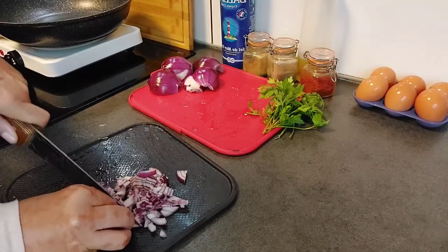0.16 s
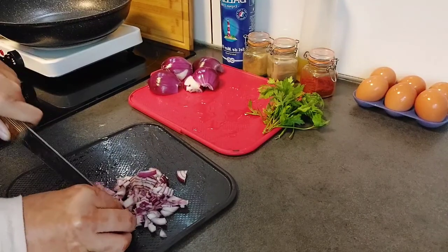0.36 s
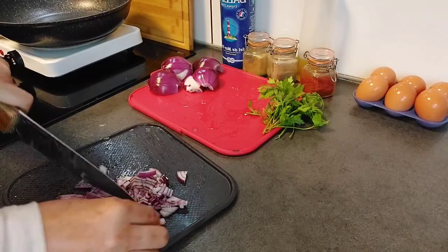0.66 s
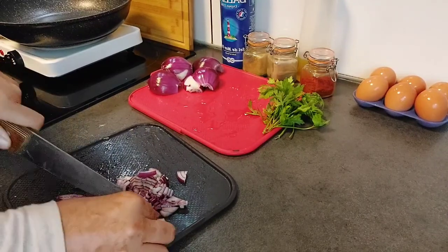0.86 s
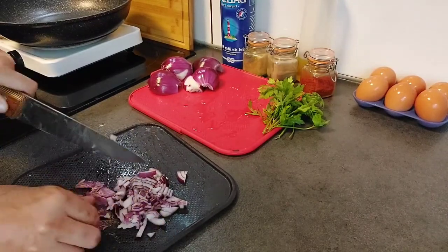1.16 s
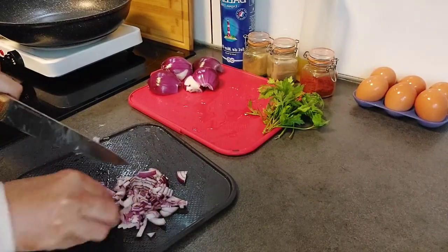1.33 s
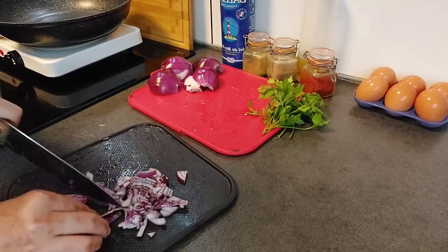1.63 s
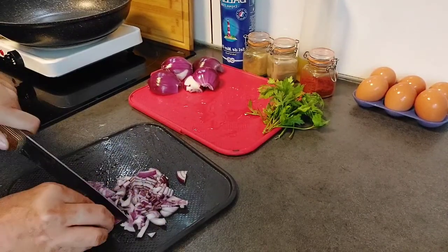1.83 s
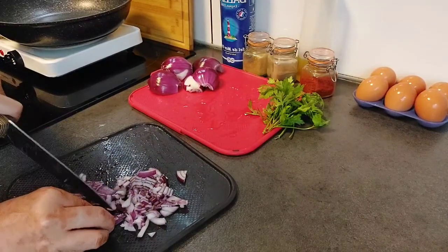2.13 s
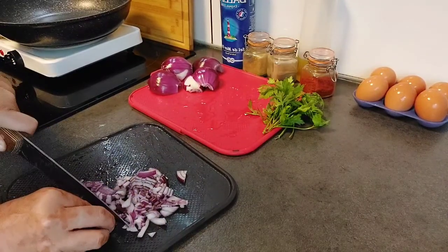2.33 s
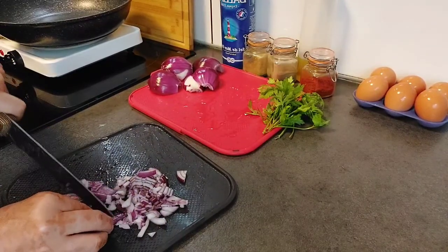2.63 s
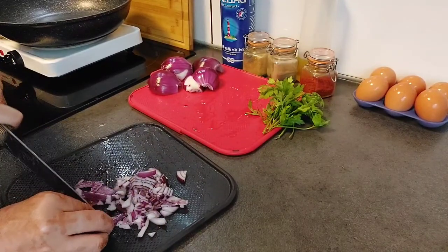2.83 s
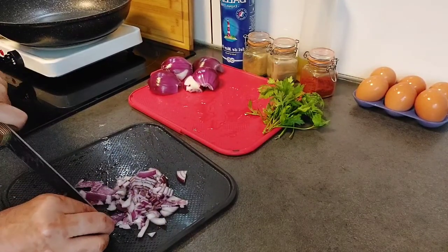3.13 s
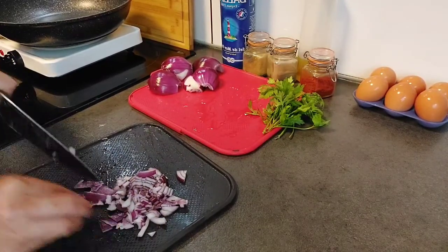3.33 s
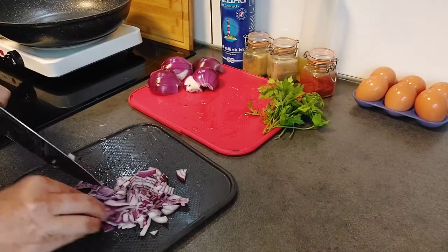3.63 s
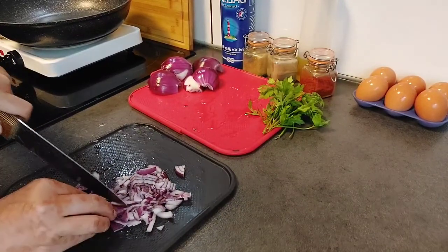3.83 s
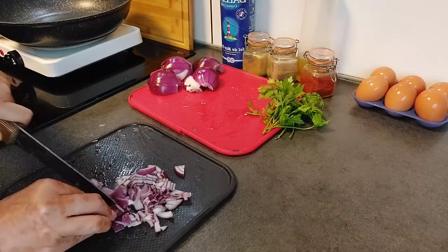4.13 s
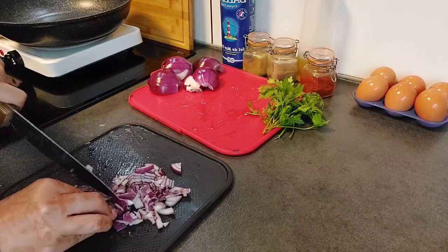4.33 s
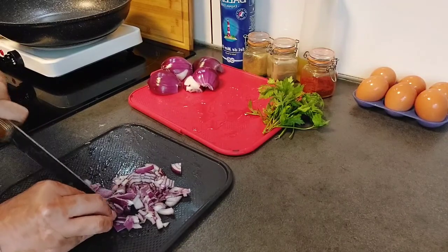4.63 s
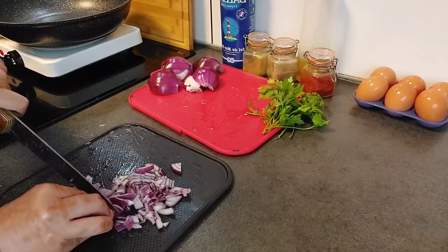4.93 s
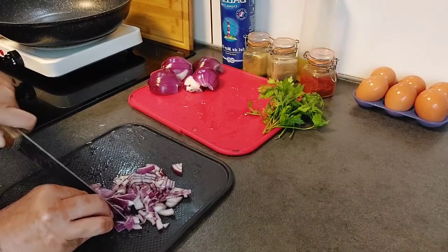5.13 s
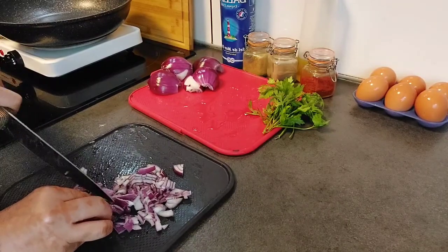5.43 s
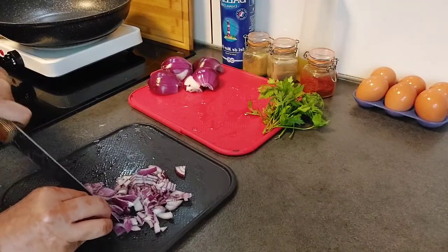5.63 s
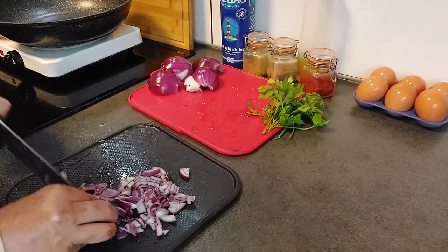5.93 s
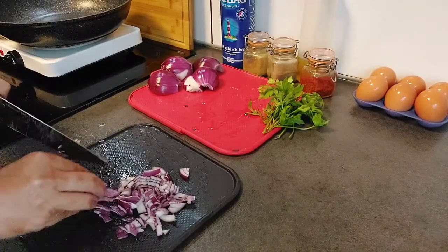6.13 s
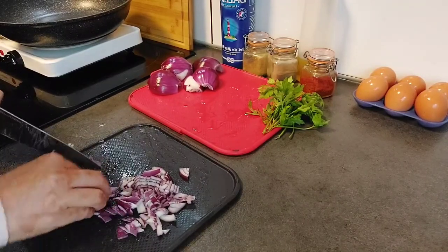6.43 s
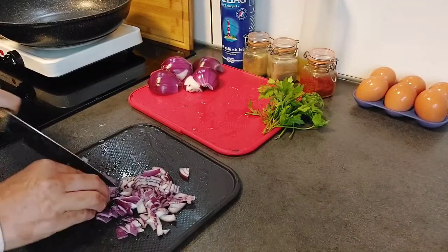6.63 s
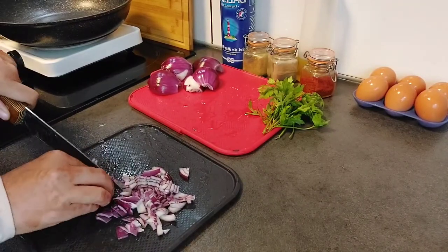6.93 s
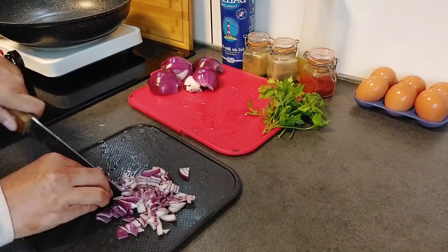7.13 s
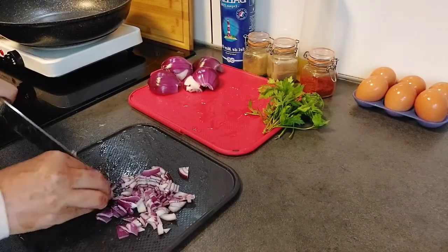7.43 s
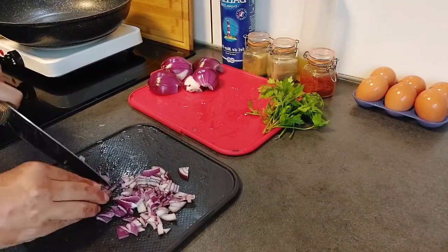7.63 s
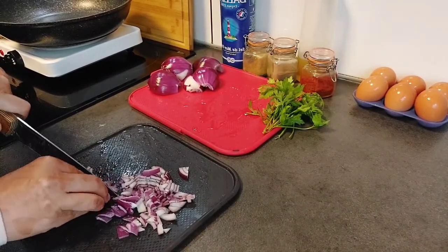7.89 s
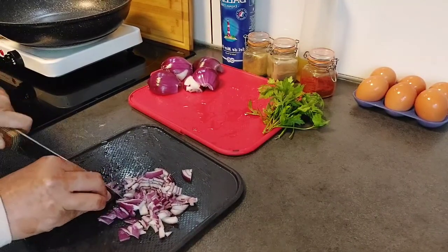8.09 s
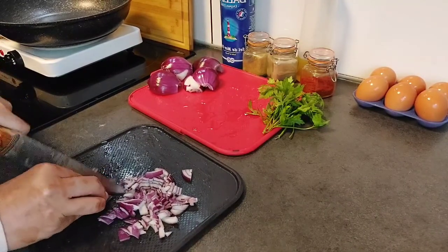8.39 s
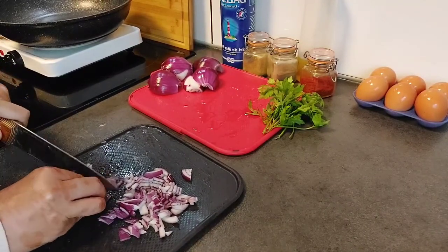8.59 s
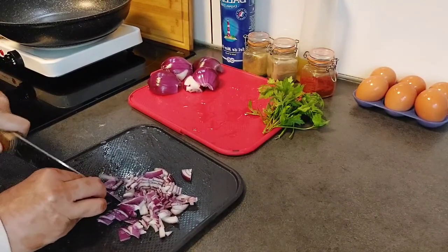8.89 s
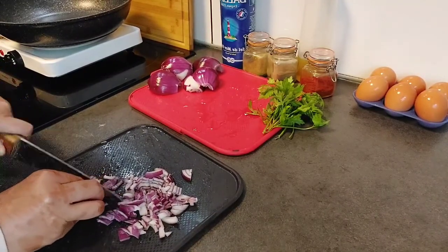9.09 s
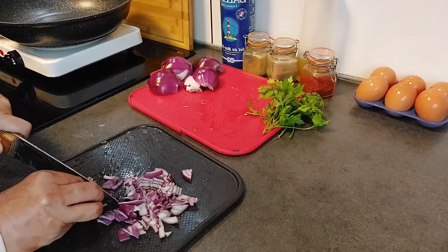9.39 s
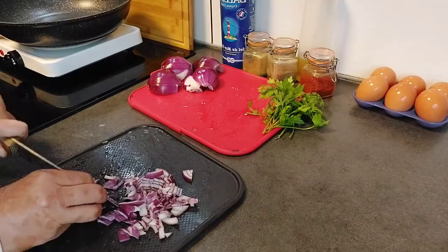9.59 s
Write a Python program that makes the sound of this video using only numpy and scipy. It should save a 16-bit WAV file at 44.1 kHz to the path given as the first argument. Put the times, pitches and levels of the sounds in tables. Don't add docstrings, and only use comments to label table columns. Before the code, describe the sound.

A knife dices onion on a plastic board on a counter, close to a stereo microphone. Wet layers crunch and snap, then the blade cracks onto the board with a short hollow bark. After light first cuts, the hardest knock comes near three seconds, a busier run follows in the middle, then a pause with rustling and two late cuts. The kitchen is small and reflective, with quiet air and a faint wall clock.

```python
import sys
import numpy as np
from scipy import signal
from scipy.fft import rfft, irfft, next_fast_len
from scipy.io import wavfile
from scipy.ndimage import uniform_filter1d

SR = 44100
rng = np.random.default_rng(int(sys.argv[2]) if len(sys.argv) > 2 else 0)


def persist_wave(psi):
    counts = np.round(np.clip(psi, -1, 1) * 32767).astype(np.int16)
    wavfile.write(sys.argv[1], SR, np.atleast_2d(counts).T)


def invert_db(level):
    return 10 ** (np.asarray(level, dtype=float) / 20)


N = 429975

# [f/Hz, level/dB]
SPRAY = [(6000, -29), (8000, -3.5), (12000, -0.5), (15800, -2)]
BOARD_HZ = [226, 300, 446, 533, 570, 646, 700, 745, 815, 885, 935, 990, 1073, 1187]
# [level/dB, time to fall 60 dB/s]
BOARD_RING = [(-12, 0.095), (-6.5, 0.17), (1.5, 0.13), (-4.5, 0.11), (0.5, 0.16), (-4, 0.091), (-3, 0.087),
              (-3.5, 0.071), (0.5, 0.16), (-7, 0.12), (-6, 0.081), (-6.5, 0.076), (-10.5, 0.055),
              (-8, 0.069)]
BOARD = [(hz, *row) for hz, row in zip(BOARD_HZ, BOARD_RING)]


def evened(x):
    return x / np.sqrt(np.mean(x ** 2) + 1e-20)


def peaked(x):
    return x / abs(x).max()


def read(points, hz):
    f, value = np.transpose(points)
    return np.interp(np.log(hz + 1), np.log(f + 1), value)


def curve(rows):
    s, *columns = np.transpose(rows)
    return [np.interp(np.arange(N) / SR, s, c) for c in columns]


def add(mix, s, sound):
    part = mix[..., round(s * SR):][..., :sound.shape[-1]]
    part += sound[..., :part.shape[-1]]


def coloured(x, spectrum):
    size = next_fast_len(x.shape[-1])
    gain = invert_db(read(spectrum, np.fft.rfftfreq(size, 1 / SR)))
    return evened(irfft(rfft(x, size) * gain, size)[..., :x.shape[-1]])


def air():
    # [t/s, level/dB]
    rumble = [(0.0, -52.5), (0.35, -56), (0.8, -66.5), (1.79, -63), (2.66, -67.5), (3.01, -61.5),
              (3.61, -70.5), (4.32, -63.5), (6.98, -63.5), (7.2, -57.5), (7.44, -68), (7.87, -60.5),
              (8.4, -72), (9.75, -64)]
    # [f/Hz, level/dB]
    hiss_colour = [(82, -38), (160, -8.5), (406, -4), (567, -9.5), (840, -9), (1300, -10.5), (1800, -22.5),
                   (2290, -31), (3210, -30.5), (3750, -35.5), (9110, -28), (15500, -38)]
    # [f/Hz, level/dB]
    low_colour = [(12, -71), (20, -26), (29, -36), (40, 3.5), (65, 12.5), (119, 6.5), (155, -9.5),
                  (180, -8), (230, -5.5), (370, -120)]
    # [f/Hz, likeness from -1 to 1]
    likeness = [(60, 0.41), (240, 0.83), (950, -0.54), (3770, 0.13), (15000, -0.03)]
    hiss_db = -70.5
    size = next_fast_len(N)
    hz = np.fft.rfftfreq(size, 1 / SR)
    same = np.clip(read(likeness, hz), -1, 1)
    left, other = rfft(rng.standard_normal((2, size)))
    right = same * left + np.sqrt(1 - same ** 2) * other
    pair = irfft(np.array([left, right]), size)[:, :N]
    lumps = rng.standard_normal(N) + 0.44 * rng.standard_normal((2, N))
    return invert_db(hiss_db) * coloured(pair, hiss_colour) + invert_db(curve(rumble)[0]) * coloured(lumps, low_colour)


def hum():
    # [t/s, f/Hz, level/dB]
    engine = [(6.6, 129.5, -101), (6.704, 123.8, -63.5), (6.846, 138.3, -76.5), (7.554, 150.2, -71.5),
              (7.75, 154.7, -79)]
    # [start t/s, end t/s, f/Hz, level/dB]
    whines = [
        (0.01, 1.336, 1097, -79),
        (3.3, 4.1, 1108, -84),
        (1.38, 1.8, 1600, -84),
    ]
    hz, db = curve(engine)
    t = np.arange(N) / SR

    def between(start, end):
        return uniform_filter1d(1. * (t > start) * (t < end), 4000)

    turn = 2 * np.pi * np.cumsum(hz) / SR
    out = between(engine[0][0], engine[-1][0]) * invert_db(db) * np.sqrt(2) * np.sin(turn)
    for start, end, hz, db in whines:
        waver = 1 + 0.0045 * evened(uniform_filter1d(rng.standard_normal(N), 2000))
        turn = 2 * np.pi * np.cumsum(hz * waver) / SR
        out += between(start, end) * invert_db(db) * np.sqrt(2) * np.sin(turn)
    return out


def stroke(s, db, rise, fall):
    swing_db = 30
    t = np.arange(0, N, 32) / SR - s
    return invert_db(db - swing_db * np.where(t < 0, -t / max(rise, .003), t / max(fall, .003)))


def loudest(gains):
    return np.repeat(np.max(gains, axis=0), 32)[:N]


def grains(per_s, spread_db):
    size = invert_db(spread_db * np.minimum(rng.exponential(1, N), 5))
    return rng.standard_normal(N) * size * (rng.random(N) < per_s / SR)


def patchy(x, depth_db):
    z = signal.stft(x, nperseg=256)[2]
    field = uniform_filter1d(rng.standard_normal(z.shape[1:]), size=4, axis=0)
    field = uniform_filter1d(field, size=20, axis=1)
    return evened(signal.istft(z * invert_db(depth_db * evened(field)), nperseg=256)[1][:, :N])


def rustle():
    # [peak t/s, fizz level/dB, rise/s, fall/s, spray over fizz/dB]
    cuts = [(0.23, -46, .1, 0.1, -1.5), (1.899, -57, 0.28, 0.09, -4.5), (1.915, -49, 0.018, 0.21, -5.5),
            (2.294, -58.5, 0.012, 0.34, -4), (2.336, -53, 0.059, 0.33, -6), (2.715, -63.5, .012, 0.32, 1.5),
            (2.782, -43, 0.057, 0.078, -0.5), (2.841, -49.5, 0.086, 0.16, -8),
            (3.093, -46, 0.041, 0.024, -9), (4.033, -59.5, 0.27, 0.37, -1.5), (4.1, -39.5, 0.02, .13, -4),
            (4.514, -55.5, 0.079, 0.36, -1), (4.58, -41.5, 0.018, 0.15, -1.5), (5.07, -61.5, 0.081, 0.2, 9),
            (5.65, -41, 0.019, 0.14, 0.5), (5.861, -56.5, .6, 0.022, -6), (5.868, -46, .015, 0.13, -5),
            (7.957, -51.5, 0.013, 0.11, 6.5), (8.029, -52, 0.12, 0.19, -1.5), (8.856, -64, 0.14, .1, 7),
            (8.901, -47.5, 0.11, 0.18, -5.5), (8.969, -54, 0.16, 0.16, -2.5),
            (9.351, -58.5, 0.0082, 0.31, -1.5)]
    # [peak t/s, fizz level/dB, rise/s, fall/s, spray over fizz/dB]
    sweeps = [(0.16, -66.5, 0.077, 0.3, 0), (0.36, -63, 0.28, 0.29, -0.5), (0.472, -63.5, 0.3, 0.21, -13),
              (0.944, -75, 0.008, 0.11, 6.5), (1.235, -73.5, 0.017, .3, -10), (1.389, -63, 0.23, 0.088, -9),
              (1.57, -75, 0.049, 0.51, -16), (3.234, -50.5, 0.2, 0.069, -8.5),
              (3.53, -68.5, 0.02, 0.76, -8), (3.66, -67, 0.39, 0.088, -6),
              (4.832, -64.5, 0.52, 0.085, -3.5), (5.193, -52, 0.2, 0.19, -5), (5.5, -73.5, 0.85, 0.99, 3),
              (6.335, -67.5, 0.017, 0.7, -16), (6.411, -69, 0.25, 0.28, -13), (1.728, -68, .02, .5, -7),
              (1.765, -69, 0.022, 0.76, 2), (3.36, -77, 0.54, 0.33, -10), (7.65, -84.5, 0.084, 0.19, -20),
              (6.88, -69, 0.15, 0.15, -1), (7.219, -58, 0.19, 0.27, -1.5),
              (7.559, -81.5, 0.028, .42, -19.5), (8.311, -78.5, 0.52, 0.86, 5.5),
              (8.439, -80, 0.059, 0.55, 0), (9.16, -60.5, 0.053, 0.077, -4.5),
              (9.615, -60, 0.028, 0.18, -3.5)]
    # [peak t/s, level/dB, rise/s, fall/s]
    scrapes = [(0.33, -56, 0.47, 0.26), (0.472, -57, 0.41, 0.56), (1.95, -60.5, 0.57, 0.68),
               (2.337, -63.5, 0.33, 0.53), (2.471, -61, 0.41, 0.63), (2.83, -44, 0.18, 0.22),
               (3.095, -52, 0.081, 0.14), (3.234, -50, 0.39, 0.097), (4.125, -51.5, 0.088, 0.35),
               (4.53, -58, 0.17, 1), (5.196, -57.5, 0.12, 0.83), (5.721, -63, 0.062, 0.22),
               (5.86, -53, .3, 0.14), (7.1, -64, 0.051, 0.47), (7.33, -61.5, 0.46, 0.16),
               (0.9, -66.5, 0.6, 1), (1.5, -66.5, 1, 0.8), (8.028, -40, 0.086, 0.14),
               (8.89, -50.5, .05, 0.49), (8.97, -57, 0.38, 0.36), (9.355, -56, 0.049, 0.41),
               (9.611, -62, 0.069, 0.64)]
    # [f/Hz, level/dB]
    fizz_colour = [(880, -10), (1500, -15), (1860, -13.5), (2100, -4), (2320, -6), (4200, -4), (4830, 0.5),
                   (8000, -9), (10400, -26), (17600, -120)]
    # [f/Hz, level/dB]
    scrape_colour = [(150, -52.5), (250, -33.5), (296, 6.5), (480, 3.5), (716, 5.5), (1000, -6),
                     (1570, -14), (2460, -14.5), (3290, -27.5), (4500, -44.5), (5850, -57), (9900, -120)]
    rest_db = -71.5
    strokes = cuts + sweeps
    fizz = np.array([stroke(*row[:4]) for row in strokes])
    spray = invert_db([row[4] for row in strokes])[:, None] * fizz
    scrape = np.maximum(loudest([stroke(*row) for row in scrapes]), invert_db(rest_db))
    clumps = evened(uniform_filter1d(rng.standard_normal(N), 300))
    cells = grains(3500, 3.0) + .6 * rng.standard_normal((2, N))
    cells = patchy(cells, 2.6)
    crackle = loudest(fizz) * coloured(cells, fizz_colour)
    crackle = crackle + invert_db(5.0) * loudest(spray) * coloured(cells, SPRAY)
    slips = scrape * coloured(grains(3000, 2.8), scrape_colour)
    return invert_db(2.2 * clumps) * crackle + invert_db(-2) * slips


def ring(modes, spread_db, rise_s, scatter=0., wide=False):
    apart_per_khz = 1.3
    hz, db, t60 = np.transpose(modes)[:, :, None]
    t = np.arange(round(SR * t60.max())) / SR
    chance = rng.standard_normal((4, 20, 1))[:, :len(modes)]
    turn = 2 * np.pi * hz * (1 + .003 * chance[1]) * t + scatter * chance[2]
    level = invert_db(db + spread_db * chance[0] - 60 * t / t60)
    apart = apart_per_khz * np.minimum(hz / 1000, 1) ** 2 * chance[3] / 2
    sides = (1, -1) if wide else (0,)
    waves = [(level * np.sin(turn + k * apart)).sum(0) for k in sides]
    return peaked(np.squeeze(waves) * (1 - np.exp(-t / rise_s)) ** 2)


def burst(t60, spectrum, click=0.75):
    t = np.arange(-256, 3000) / SR
    x = rng.standard_normal(len(t)) * invert_db(-60 * t / t60) * (t >= 0)
    x[256] += click
    return peaked(coloured(x, spectrum)[236:])


def snaps():
    # [t/s, peak level/dB, centre f/Hz, board ring over snap/dB]
    layers = [(0.2239, -24.5, 7000, -18.5), (0.2397, -27.5, 6070, -15.5), (0.4618, -35, 5190, -12),
              (1.8741, -33, 13200, -35), (1.914, -27, 4900, -19.5), (2.3347, -25, 7800, -16),
              (2.7591, -29, 5780, -24.5), (3.2031, -32, 11400, -15), (4.0374, -26, 4870, -23),
              (4.518, -30, 4980, -23.5), (4.582, -18, 7000, -21), (4.5973, -21.5, 5030, -22),
              (5.0707, -23, 5140, -19), (5.164, -29.5, 5000, -18), (5.6282, -28.5, 11170, -23),
              (5.721, -39, 2605, -29), (5.8672, -24.5, 3420, -21), (7.184, -33.5, 5210, -18),
              (7.953, -34, 6070, -17.5), (8.8325, -29.5, 7140, -24), (8.8784, -38, 5510, -16),
              (8.883, -30, 5550, -18), (9.1521, -50, 5340, -5), (9.3722, -32, 5170, -14)]
    # [t/s, peak level/dB]
    ticks = [(0.1956, -42), (0.2300, -35), (0.3013, -31), (0.322, -36), (0.342, -42), (0.3821, -42),
             (1.6054, -58), (1.7266, -53), (1.763, -40), (3.7874, -64), (4.019, -49.5), (4.030, -48),
             (4.0953, -22), (4.4998, -41), (5.049, -48), (5.5182, -45), (6.31, -60), (6.836, -47),
             (6.882, -46), (7.0646, -43), (7.085, -48), (7.229, -42), (8.4049, -45), (8.5087, -56),
             (8.7654, -44), (9.607, -48), (0.9475, -55), (1.223, -49), (2.296, -49), (2.378, -30),
             (2.7067, -49), (3.076, -38), (3.86, -50), (4.456, -41.5), (4.8376, -51.5), (4.994, -46),
             (6.764, -51), (7.636, -59), (3.249, -42), (7.159, -43), (8.8068, -39), (8.861, -46),]
    tick_hz = 6600
    tap_share = .4
    tapped = [(f, level, t60 * tap_share) for f, level, t60 in BOARD]
    out = np.zeros(N)
    for s, db, hz, *board_db in layers + [row + (tick_hz,) for row in ticks]:
        colour = [(1500, -30), (hz * 0.52, -8), (hz, 0), (hz * 3.1, -6), (hz * 4, -12)]
        add(out, s - 20 / SR, invert_db(db) * burst(.006, colour, click=3.))
        if board_db:
            add(out, s, invert_db(db + board_db[0]) * ring(tapped, 2.1, 0.0022, scatter=1.2))
    return out


def resonate(x, hz, width):
    turn = np.exp(2j * np.pi * np.cumsum(hz) / SR)
    r = np.exp(-np.pi * width / SR)
    return (turn * signal.lfilter([1], np.convolve([1, -r], [1, -r]), x / turn)).real


def slides():
    # [start t/s, length/s, start f/Hz, end f/Hz, level/dB]
    drags = [(0.433, 0.067, 695, 646, -61), (1.928, 0.15, 790, 725, -61.5), (2.517, 0.05, 557, 540, -59),
             (5.862, 0.035, 3400, 3450, -44), (5.863, 0.058, 2175, 2240, -54.5),
             (6.333, 0.075, 2330, 2280, -74), (3.24, 0.016, 2520, 2480, -52), (0.39, 0.12, 2200, 2150, -68),
             (0.33, 0.1, 7900, 8100, -63), (0.3, 0.2, 5200, 5000, -67), (7.06, 0.09, 5200, 5100, -73),
             (7.18, 0.17, 5200, 4900, -68), (0.945, 0.02, 2850, 2800, -75), (3.2, 0.05, 8000, 7900, -57),
             (7.083, 0.02, 557, 532, -57), (7.099, 0.06, 400, 480, -62), (7.17, 0.093, 734, 846, -60),
             (7.19, 0.12, 2760, 2605, -70), (7.17, 0.22, 2250, 2150, -70), (7.635, 0.06, 2350, 2250, -77),
             (7.25, 0.11, 855, 703, -61.5)]
    # [start t/s, length/s, start f/Hz, end f/Hz, level/dB]
    squeaks = [
        (5.862, .062, 660, 610, -47),
        (5.868, .042, 900, 876, -47),
        (5.925, .032, 890, 847, -58),
        (7.53, .37, 320, 306, -69),
    ]
    out = np.zeros(N)
    for rows, width_share in ((drags, .2), (squeaks, .1)):
        for start, length, hz, end_hz, db in rows:
            size = round(length * SR)
            strength = invert_db(2.6 * np.minimum(rng.exponential(1, SR // 2), 4))
            slips = rng.standard_normal(SR // 2) * strength
            tone = resonate(slips[:size], np.linspace(hz, end_hz, size), width_share * hz)
            add(out, start, invert_db(db) * evened(tone) * signal.windows.tukey(size, .3))
    return out


def clock():
    tick_times = [.535, 1.553, 2.553, 3.55, 4.55, 5.55, 6.515, 7.553, 8.54, 9.525]
    tick_hz, tick_db, size = 3230, -74.5, 1100
    out = np.zeros(N)
    for s in tick_times:
        tick = resonate(rng.standard_normal(size), np.full(size, tick_hz), 150.)
        add(out, s, invert_db(tick_db) * evened(tick) * np.hanning(size))
    return out


def thuds():
    # [t/s, peak level/dB]
    landings = [(1.247, -52), (2.291, -33.5), (2.711, -35.5), (2.784, -37.5), (3.076, -38), (3.53, -58.5),
                (3.904, -58.5), (4.109, -53.5), (4.462, -37), (4.998, -43), (5.075, -41.5), (5.563, -42.5),
                (5.652, -32.5), (7.965, -38.5), (8.916, -41.5), (9.355, -37)]
    # [f/Hz, level/dB, time to fall 60 dB/s]
    counter = [(111, 3, .3), (89.9, -11, 0.3), (60, -18, .3), (160, -12, .12)]
    # [f/Hz, level/dB, time to fall 60 dB/s]
    shelf = [(225, -8, 0.17), (298, -11.5, 0.28), (440, -12.5, 0.081)]
    press_s = .004
    shelf_db = -12.5
    out = np.zeros(N)
    for s, db in landings:
        add(out, s - press_s, invert_db(db) * ring(counter, 0.92, 0.0031))
        add(out, s - press_s, invert_db(db + shelf_db) * ring(shelf, 4.6, 0.0043))
    return out


def favoured(modes, hz, db, octaves, share=0.64):
    return [(f, level + db * np.exp(-(np.log2(f / hz) / octaves) ** 2), share * t60) for f, level, t60 in modes]


def knocks():
    # [t/s, crack peak/dB, board ring over crack/dB, struck patch f/Hz, left-right/dB]
    blows = [
        (2.7859, -5, -9, 503, 0.5),
        (3.099, -18.5, -1, 650, 0),
        (4.103, -25, -11, 708, -3.5),
        (4.606, -12, -4, 650, -2),
        (5.0782, -20, -3.5, 450, -1.5),
        (5.6511, -18.5, -18, 468, -6.5),
        (5.6691, -8, -6.5, 529, 0),
        (7.9667, -12, -1.5, 610, -4),
        (8.9121, -18.5, 8.5, 709, 10.5),
    ]
    # [favour near the patch/dB, width/octaves, patch bark/dB,
    # blade over board/dB, share of full ring time]
    places = [(1.5, .4, 15, -15, .6), (1, 0.57, 14, -18, .7), (-4, 0.3, 10.5, -14.5, 0.92),
              (12.5, .45, 18, -17.5, 0.7), (3.5, 0.49, 14.5, -14, 0.47), (8, .4, 14.5, -17.5, 1),
              (4, .35, 17.5, -12, .7), (5, 0.92, 11.5, -19, 0.74), (11, 0.21, 15, -21, 0.74)]
    # [f/Hz, level/dB]
    crack_colour = [(700, -11.5), (1200, -40), (2400, -2.5), (4000, -8), (5500, -7), (7500, -17),
                    (10000, -16), (16000, -48.5)]
    # [f/Hz, level/dB]
    chatter_colour = [(900, -26.5), (1450, -3), (1850, -20.5), (2200, -0.5), (2650, -1), (3200, -15),
                      (4200, -27)]
    blade_hz = [1400, 2020, 2165, 2310, 2500, 2675, 2790, 3030, 3320]
    # [level/dB, time to fall 60 dB/s]
    blade_ring = [(-8, 0.039), (-7, 0.11), (-3.5, 0.11), (-4, 0.11), (0.5, 0.058), (-4, 0.044),
                  (-3.5, 0.074), (-5.5, .1), (-9, 0.16)]
    blade = [(hz, *row) for hz, row in zip(blade_hz, blade_ring)]
    contact_s = .0014
    spurt_db = -19
    bark_t60 = .018
    chatter_db = -14.5
    bounce_s, bounce_db, bounce_hz = .043, -13, 450
    out = np.zeros((2, N))
    for blow, place in zip(blows, places):
        s, db, board_db, patch_hz, pan_db = blow
        near_db, octaves, bark_db, blade_db, share = place
        hit_s, ring_db = s + contact_s, db + board_db
        side = invert_db(db + np.array([[.5], [-.5]]) * pan_db)
        juice = invert_db(spurt_db) * burst(0.0089, SPRAY)
        crack = burst(.005, crack_colour, click=2.5)
        add(out, hit_s - 20 / SR, side * (crack + juice))
        board = favoured(BOARD, patch_hz, near_db, octaves, share) + [(patch_hz, bark_db, bark_t60)]
        add(out, hit_s, invert_db(ring_db) * ring(board, 1.5, 0.0005, scatter=1.0, wide=True))
        add(out, hit_s, invert_db(ring_db + blade_db) * ring(blade, 2.8, 0.00062, scatter=2.8, wide=True))
        add(out, hit_s, invert_db(ring_db + chatter_db) * burst(0.07, chatter_colour, click=0))
        falling = favoured(BOARD[:8], bounce_hz, 10.5, 0.12)
        bounce = ring(falling, 0.86, 0.0048, scatter=3.7, wide=True)
        add(out, s + bounce_s, invert_db(ring_db + bounce_db) * bounce)
    return out


def room(x):
    # [f/Hz, time to fall 60 dB/s, level/dB]
    tail_bands = [(102, 0.092, -8), (272, 0.5, 9), (450, 0.099, -13), (710, 0.25, 2), (1880, 0.34, 2),
                  (4570, 0.28, -3.5), (12700, 0.049, -2.5)]
    # [delay/s, level/dB]
    echoes = [(.00074, -9), (.0019, -13), (.0031, -15), (.0043, -15), (.0056, -16), (.0098, -17)]
    # [f/Hz, left-right/dB]
    shadow = [(300, 1.5), (1000, 1), (2000, 14), (4000, 4), (8000, 5), (12000, -3.5)]
    right_lag_s = 0.00016
    taps = rng.standard_normal((2, SR // 2)) * (np.arange(SR // 2) > 200)
    hz, t, z = signal.stft(taps, SR, nperseg=256)
    t60, wet_db = (read([(row[0], row[k]) for row in tail_bands], hz)[:, None] for k in (1, 2))
    z = z * invert_db(wet_db - 60 * t / t60) * np.sqrt(6 * np.log(10) / (t60 * SR))
    tail = signal.istft(z, SR, nperseg=256)[1]
    low = signal.sosfiltfilt(signal.butter(1, 250, fs=SR, output="sos"), tail[0] - tail[1])
    tail = np.array([tail[0], tail[1] + low])
    for s, db in echoes:
        delays = s * (1 + rng.uniform(-1, 1, 2) * .04)
        tail[[0, 1], np.round(delays * SR).astype(int)] += invert_db(db)
    size = next_fast_len(N)
    hz = np.fft.rfftfreq(size, 1 / SR)
    shade = invert_db(read(shadow, hz) / 2)
    ports = np.array([shade, np.exp(-2j * np.pi * hz * right_lag_s) / shade])
    direct = irfft(rfft(x, size) * ports, size)[:, :N]
    return direct + signal.fftconvolve(x, tail, axes=1)[:, :N]


def scene():
    near = rustle() + snaps() + slides() + thuds() * invert_db([[-.8], [.8]]) * 1 + knocks()
    return invert_db(1.0) * room(near + clock()) + air() + hum()


def band_limit(x):
    return signal.sosfilt(signal.butter(12, 16660, fs=SR, output="sos"), x)


def record(dry):
    mic_low_hz, top_hz = 45, 15830
    dry = signal.sosfilt(signal.butter(3, mic_low_hz, "high", fs=SR, output="sos"), dry)
    treble_cut = signal.firwin(801, top_hz, window=("kaiser", 8), fs=SR)
    mix = signal.oaconvolve(dry, treble_cut[None], "same")
    return band_limit(mix)


dry = scene()
out = record(dry)
persist_wave(out)
```